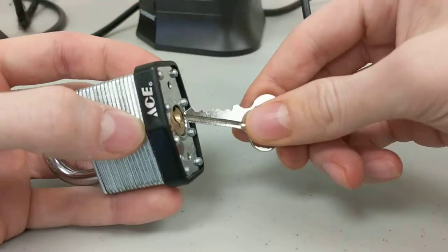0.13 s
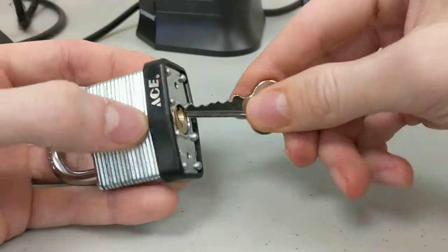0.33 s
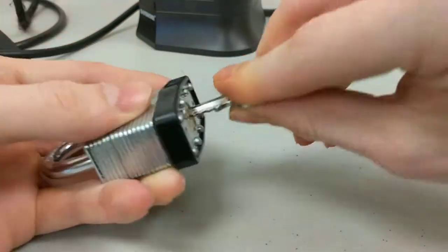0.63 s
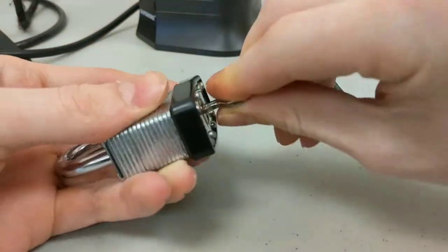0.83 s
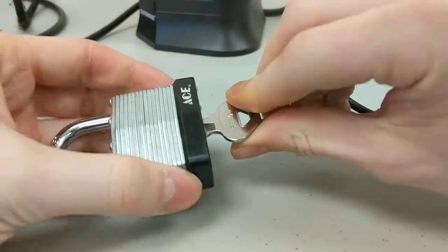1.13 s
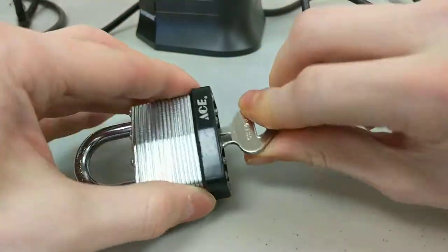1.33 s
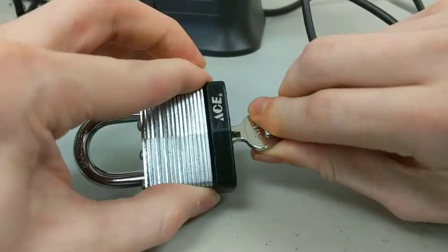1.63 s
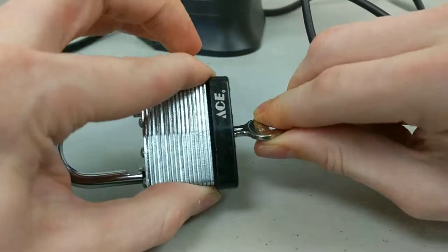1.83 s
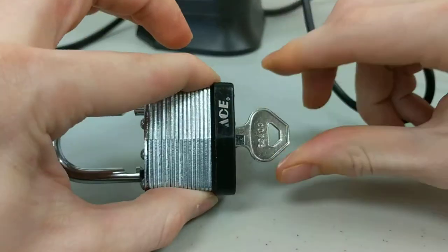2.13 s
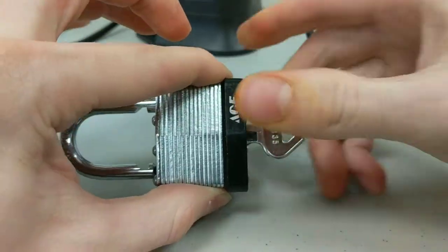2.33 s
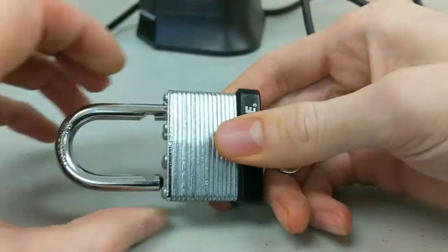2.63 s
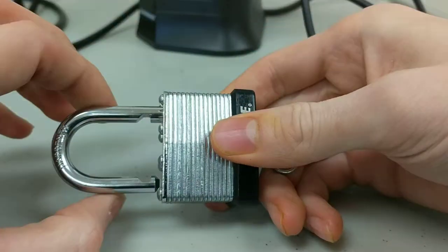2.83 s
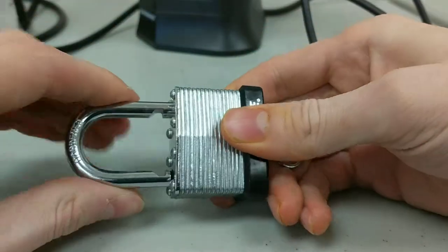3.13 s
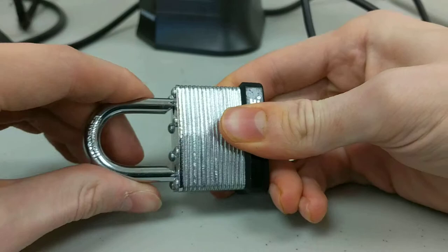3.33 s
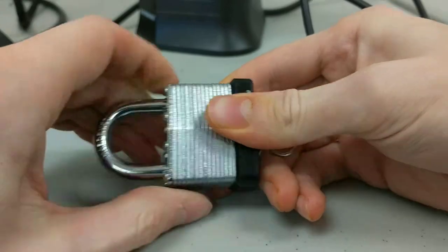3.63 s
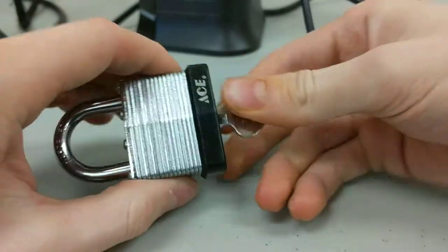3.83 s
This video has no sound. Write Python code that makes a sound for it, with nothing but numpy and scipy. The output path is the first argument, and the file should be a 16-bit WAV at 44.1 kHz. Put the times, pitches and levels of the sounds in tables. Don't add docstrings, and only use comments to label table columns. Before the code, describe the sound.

Close, dry mono pickup at a desk in a quiet ventilated room: faint key ticks, a sharp seating click, a bright shackle snap, soft finger rubbing, then a loud latch clack and small bumps.

```python
import sys
import numpy as np
from scipy import signal
from scipy.fft import rfft, irfft
from scipy.io import wavfile
from scipy.ndimage import uniform_filter1d

SR = 44100
rng = np.random.default_rng(int(sys.argv[2]) if len(sys.argv) > 2 else 0)


def field_ratio(decibels):
    return 10 ** (np.asarray(decibels, dtype=float) / 20)


def int16_out(signal):
    q = np.round(np.clip(np.atleast_2d(signal).T, -1, 1) * 32767)
    wavfile.write(sys.argv[1], SR, q.astype(np.int16))


N = 176400

# (frequency [Hz], level [dB])
AIR_SPECTRUM = [(25, -30), (45, -0.5), (117, -1), (270, -14), (600, -28), (1400, -34.5), (4500, -43),
                (16000, -52.5)]
# (frequency [Hz], width [Hz], level [dB])
WHINES = [(2080, 160, -84), (6100, 70, -96), (10380, 90, -95), (11650, 60, -95), (117.5, 20, -62.5)]
# (start [s], length [s], hiss level [dB], scrape level [dB], share of the length spent swelling [0-1])
RUBS = [(1.058, 0.17, -60, -68, 0.34), (1.154, 0.23, -58.5, -65.5, 0.49), (1.287, 0.02, -71, -55, .4),
        (1.304, 0.066, -59, -53.5, 0.21), (1.992, 0.91, -73.5, -76, 0.1), (2.419, 0.036, -60, -54, .05),
        (2.449, 0.041, -53, -46.5, 0.034), (2.471, .05, -66, -59, .3), (2.531, 0.25, -55.5, -55, 0.83),
        (2.637, 0.037, -73, -53, 0.5), (3.158, 0.4, -64.5, -60, 0.58), (3.578, 0.22, -56, -52.5, 0.36),
        (3.618, 0.02, -70, -48, 0.44), (3.637, 0.079, -72, -42, 0.42), (3.85, 0.093, -61.5, -52, 0.085)]
# (start [s], length [s], level [dB], share spent swelling [0-1])
SKIMS = [
    (0, 0.23, -76, 0.41),
    (2.328, 0.23, -77, 0.62),
    (0.761, 0.14, -71.5, .1),
    (1.076, 0.14, -63.5, 0.44),
    (1.22, 0.12, -65.5, 0.45),
    (2.56, 0.21, -59, 0.58),
    (3.657, .09, -66, 0.82),
]
# (frequency [Hz], level [dB])
HISS_SPECTRUM = [(500, -41.5), (1900, -6.5), (2200, -1), (2550, -10.5), (5500, -19.5), (9000, -21.5),
                 (14000, -24.5), (16000, -27)]
SCRAPE_SPECTRUM = [(60, -22.5), (120, 9), (300, 4), (700, -3.5), (1400, -11), (3300, -16), (6000, -28),
                   (16000, -70.5)]
SKIM_SPECTRUM = [(5000, -30), (8500, -1.5), (10000, -7), (11300, 3), (12300, 0), (14500, 4), (16000, -2)]
# (time [s], peak level [dB], pitch [Hz], time to fall 60 dB [s])
THUDS = [(.757, -31.5, 87.2, 0.22), (1.838, -23, 121, 0.039), (2.4495, -28, 322, 0.04),
         (2.461, -35, 120.2, 0.21), (3.6575, -45, 300, 0.011), (3.6648, -27, 320, 0.0082),
         (3.669, -41, 230, 0.016), (3.678, -24.5, 264, 0.023), (2.634, -36.5, 87.6, 0.12),
         (2.651, -34, 280, 0.012), (2.743, -32.5, 249, 0.015), (3.463, -29, 117, 0.12),
         (3.478, -30.5, 60.4, 0.19), (3.575, -33, 268, 0.0173), (3.862, -26, 316, 0.01),
         (3.464, -9.5, 380, 0.0039)]
# (frequency [Hz], width [Hz], level [dB])
SHACKLE_HUMS = [(5500, 760, -61), (10300, 550, -58), (12000, 280, -65)]
# (time [s], level [dB], pitch [Hz], time to fall 60 dB [s])
KEY_RINGS = [
    (.106, -64, 7000, .2),
    (1.252, -50, 13300, .03),
]
# (time [s], level [dB], pitch [Hz], time to fall 60 dB [s])
PINGS = [
    (.598, -68, 7700, 0.077),
    (3.6382, -20, 2310, 0.007),
    (3.4405, -50, 12000, .025),
    (1.838, -19, 2330, 0.011),
]
# (time [s], level [dB], pitch [Hz])
TICKS = [(.012, -60, 14500), (.0194, -58, 13500), (.031, -60, 14000), (0.044, -54.5, 9500),
         (.053, -60, 14000), (.0757, -56, 14500), (.131, -59, 10000), (.135, -60, 14500),
         (.152, -58, 13500), (.192, -62, 12500), (.2179, -60, 12000), (3.119, -44, 15000),
         (0.3463, -56.5, 11000), (.352, -61, 13000), (.444, -60, 2300), (.466, -51, 2200),
         (0.4968, -48, 6760), (0.4959, -42, 1940), (0.6478, -51, 2000), (.7135, -36, 8950),
         (.773, -45, 8000), (0.8558, -35.5, 5980), (1.394, -58.5, 4300), (1.6105, -47.5, 4000),
         (1.631, -44, 4830), (1.655, -58, 4200), (1.664, -58, 2980), (1.995, -49, 2000),
         (2.0135, -42, 5200), (2.0385, -48, 5300), (2.07, -50, 12000), (2.499, -52.5, 6200)]
# (start [s], length [s], level [dB])
GRINDS = [
    (0.489, 0.014, -61),
    (.58, 0.017, -59),
    (0.664, .04, -53),
    (0.695, 0.068, -49),
    (1.82, .03, -47),
    (3.443, 0.015, -52),
]
# (time [s], peak level of the ring [dB], level of the body [dB], time the chatter takes to fall 60 dB [s])
KEY_IN = [(0.0918, -24, -41, 0.023), (0.1034, -31.5, -45.5, 0.03), (0.3646, -56, -56.5, 0.0078),
          (0.4326, -72, -63, 0.032), (0.4596, -58, -59, 0.015), (0.4841, -62, -52.5, 0.011),
          (0.4928, -34.5, -49.5, 0.011), (0.542, -51, -52.5, 0.016), (0.5691, -63.5, -57, 0.011),
          (0.5859, -54, -42, 0.014), (0.5958, -33, -41.5, 0.0092), (0.6612, -25.5, -37, 0.0053),
          (0.6725, -31, -47, 0.017), (0.7035, -30, -80, 0.025), (0.7222, -28.5, -64, 0.012),
          (0.7287, -25.5, -61, 0.023), (0.7375, -33, -62.5, 0.011), (0.7425, -21.5, -54, 0.024),
          (0.7508, -24.5, -43.5, 0.011), (0.755, -7, -27.5, 0.0079), (0.857, -23.5, -42, 0.0043),
          (0.8752, -53, -58, 0.012), (0.9393, -64, -55, 0.015)]
KEY_TURN = [(1.2505, -42, -54.5, 0.02), (1.394, -57, -60, 0.011), (1.5557, -38, -53, 0.005),
            (1.5962, -50, -48, 0.022), (1.63, -34.5, -45, 0.012), (1.6481, -56, -48.5, 0.026),
            (1.699, -42, -49.5, 0.01), (1.7777, -63, -54, 0.013), (2.0028, -20.5, -43, 0.0081),
            (2.0055, -41, -44.5, 0.016), (2.0135, -48, -50.5, 0.032), (2.048, -20, -39, 0.011),
            (2.058, -27, -52, 0.027), (2.0602, -31, -44, 0.02), (2.5524, -50, -60, 0.016),
            (2.7951, -71, -56.5, 0.014)]
SHUT = [(3.2163, -35.5, -51, 0.011), (3.2991, -32, -49, 0.011), (3.3724, -19.5, -32, 0.017),
        (3.409, -56, -51, 0.019), (3.574, -65, -46, 0.015), (3.6332, -31, -56, 0.0093),
        (3.6379, -16, -34.5, 0.013), (3.7988, -46.5, -55.5, 0.0087), (3.8627, -49, -48, 0.019),
        (3.9, -37, -50, 0.017), (3.9137, -69, -57, 0.04)]
SNAPS = [(1.813, -32.5, -44, 0.027), (3.4397, -42, -52.5, .018), (1.8266, -20, -39, 0.01),
         (3.4465, -62, -44.5, 0.018), (3.452, -35.5, -45, 0.029), (1.8338, -9.5, -39.5, 0.014),
         (1.8368, -7.5, -29.5, 0.012), (1.8385, -0.5, -28.5, 0.014), (1.8422, -10.5, -38.5, 0.0044),
         (1.8454, -13.5, -39, 0.024), (1.8511, -25.5, -49.5, 0.01), (3.4583, -18.5, -34.5, 0.01),
         (3.4608, -13.5, -31, 0.025), (3.4631, -2, -23, 0.0068), (3.4637, 1.5, -18, 0.011),
         (3.466, -13.5, -29.5, 0.0052), (3.475, -31.5, -52, .02)]
# (frequency [Hz], width [Hz], level [dB])
PLATE_MODES = [(5360, 1200, 3.5), (7130, 400, -1.5), (6900, 180, -5.5), (9500, 43, -0.5), (9580, 580, -3.5),
               (13400, 76, 3), (12960, 500, 7), (14850, 91, 5.5), (15700, 1000, -10.5)]
BODY_MODES = [(1530, 600, 5), (2280, 820, 7.5), (2854, 190, 3.5), (3200, 5000, -9.5), (1010, 510, -6.5)]
# (frequency [Hz], level [dB])
TAIL_SPECTRUM = [(300, -28.5), (2200, -10.5), (3800, -5), (5400, -4), (8000, -7.5), (12000, -5.5),
                 (16000, -6)]

PLATE_WIDEN = 3.4
CRACK_DB = 0.5
HIT_SAMPLES = 4096


def unit(x):
    return x / np.sqrt(np.mean(x ** 2))


def grains(count, grit_db):
    return rng.standard_normal(count) * field_ratio(grit_db * rng.exponential(size=count))


def coloured(spectrum, grit_db=0):
    f = np.fft.rfftfreq(N, 1 / SR) + 1
    hz, db = np.array(spectrum, float).T
    gain = field_ratio(np.interp(np.log(f), np.log(hz), db)) * (f < 15950)
    return unit(irfft(rfft(grains(N, grit_db)) * gain, N))


def walk(rate_hz):
    hold = int(SR / rate_hz)
    steps = np.repeat(rng.standard_normal(N // hold + 1), hold)
    smooth = uniform_filter1d(uniform_filter1d(steps, hold), hold)
    return unit(smooth[:N])


def modes(table, f, spread_db=0, widen=1):
    hz, width, db = np.array(table, float).T[:, :, None]
    luck = rng.standard_normal((len(hz), 1))
    width = width * widen
    sign = (-1.) ** np.arange(len(hz))[:, None]
    peaks = 1j * f * width / (hz ** 2 - f ** 2 + 1j * f * width)
    return (sign * field_ratio(db + spread_db * luck) * peaks).sum(0)


def hums(table):
    f, out = np.fft.rfftfreq(N, 1 / SR), np.zeros(N)
    for hz, width, db in table:
        noise = rfft(rng.standard_normal(N))
        out += field_ratio(db) * unit(irfft(noise * modes([(hz, width, 0)], f) ** 2, N))
    return out


def add(out, start_s, x):
    i = int(start_s * SR)
    out[i:i + len(x)] += x[:N - i]


def decaying_tones(table, rise_s):
    out, t = np.zeros(N), np.arange(SR // 2) / SR
    for start, db, hz, t60 in table:
        fade = field_ratio(db - 60 * t / t60) * np.minimum(t / rise_s, 1)
        add(out, start, fade * -np.sin(2 * np.pi * hz * t))
    return out


def air():
    level_db = -53.5 + 1.2 * walk(3.9) + 1.3 * walk(14)
    rumble = field_ratio(level_db) * coloured(AIR_SPECTRUM)
    return rumble + hums(WHINES) * field_ratio(3.0 * walk(4.3))


def swell(start, length, share):
    peak = np.clip(share, .01, .95) * length
    rise_fall = np.interp(np.arange(N) / SR - start, [0, peak, length], [0, 1, 0])
    return np.sin(np.pi / 2 * rise_fall) ** 1.25


def rubbing():
    hiss, scrape, skim = np.zeros(N), np.zeros(N), np.zeros(N)
    for start, length, hiss_db, scrape_db, share in RUBS:
        shape = swell(start, length, share)
        hiss += field_ratio(hiss_db) * shape
        scrape += field_ratio(scrape_db) * shape
    for start, length, db, share in SKIMS:
        skim += field_ratio(db) * swell(start, length, share)
    hiss *= field_ratio(2.2 * walk(53)) * coloured(HISS_SPECTRUM, 1.46)
    scrape *= field_ratio(3 * walk(160)) * coloured(SCRAPE_SPECTRUM, 2.6)
    skim *= field_ratio(2.2 * walk(28)) * coloured(SKIM_SPECTRUM, 1.4)
    return hiss + scrape + skim


def desk_thuds():
    return decaying_tones(THUDS, rise_s=0.0014)


def shackle_hum():
    t = np.arange(N) / SR - 1.845
    return hums(SHACKLE_HUMS) * (t > 0) * field_ratio(-60 * np.abs(t) / 0.66)


def metal_rings():
    return decaying_tones(KEY_RINGS, rise_s=0.00075) + decaying_tones(PINGS, rise_s=0.00075)


def ticks():
    out, t, f = np.zeros(N), np.arange(HIT_SAMPLES) / SR, np.fft.rfftfreq(HIT_SAMPLES, 1 / SR)
    burst = np.minimum(t * 2000, 1) * field_ratio(-60 * t / .01)
    for start, db, hz in TICKS:
        hit = rfft(rng.standard_normal(HIT_SAMPLES) * burst)
        tick = irfft(hit * modes([(hz, .22 * hz, 0)], f) ** 2)
        add(out, start, field_ratio(db) * tick / np.abs(tick).max())
    return out


def grinding():
    t, f = np.arange(N) / SR, np.fft.rfftfreq(N, 1 / SR)
    push = np.zeros(N)
    for start, length, db in GRINDS:
        push += field_ratio(db) * np.interp(t - start, [0, 0.67 * length, length], [0, 1, 0])
    plates = modes(PLATE_MODES, f, 0, PLATE_WIDEN)
    response = plates + field_ratio(9) * modes(BODY_MODES, f) + field_ratio(CRACK_DB)
    response = response * f / (f + 900)
    return push * field_ratio(4 * walk(300)) * unit(irfft(rfft(grains(N, 3.5)) * response, N))


def clicks():
    out, t, f = np.zeros(N), np.arange(HIT_SAMPLES) / SR, np.fft.rfftfreq(HIT_SAMPLES, 1 / SR)
    crack = field_ratio(CRACK_DB) * f ** 4 / (f ** 4 + 6600.0 ** 4)
    for table, spread_db in [(KEY_IN, 3), (KEY_TURN, 3), (SHUT, 3), (SNAPS, 1)]:
        for start, ring_db, body_db, t60 in table:
            rise = np.minimum(t / (0.13 * t60), 1)
            chatter = rise * field_ratio(-60 * (t / max(t60, .002)) ** 0.73)
            hit = rfft(grains(HIT_SAMPLES, 3) * chatter)
            ring = irfft(hit * (modes(PLATE_MODES, f, spread_db, PLATE_WIDEN) + crack))
            body = irfft(hit * modes(BODY_MODES, f, spread_db))
            ring *= field_ratio(ring_db - 15) / ring[:130].std()
            body *= field_ratio(body_db - 3.5) / body[:130].std()
            add(out, start, ring + body)
    return out


def room(x):
    t = np.arange(SR // 2) / SR
    early = field_ratio(-20.5 - 60 * t / 0.025) * np.minimum(t / 0.0065, 1)
    early = early * rng.standard_normal(len(t)) / 10
    tail = field_ratio(-63 - 60 * t / 0.51) * np.minimum(t / 0.0082, 1)
    power = signal.fftconvolve(x ** 2, tail ** 2)[:N]
    return x + signal.fftconvolve(x, early)[:N] + np.sqrt(np.abs(power)) * coloured(TAIL_SPECTRUM)


def scene():
    metal = room(clicks() + grinding() + ticks() + metal_rings())
    return (metal + shackle_hum() + desk_thuds() + rubbing() + air())[None]


def roll_off(x):
    return signal.sosfilt(signal.butter(12, 17140, fs=SR, output="sos"), x)


def record(dry):
    limit = .6
    limited = limit * np.tanh(dry / limit)
    treble_cut = signal.ellip(8, .2, 60, 16250, fs=SR, output="sos")
    mix = signal.sosfilt(treble_cut, limited)
    return roll_off(mix)


dry = scene()
out = record(dry)
int16_out(out)
```